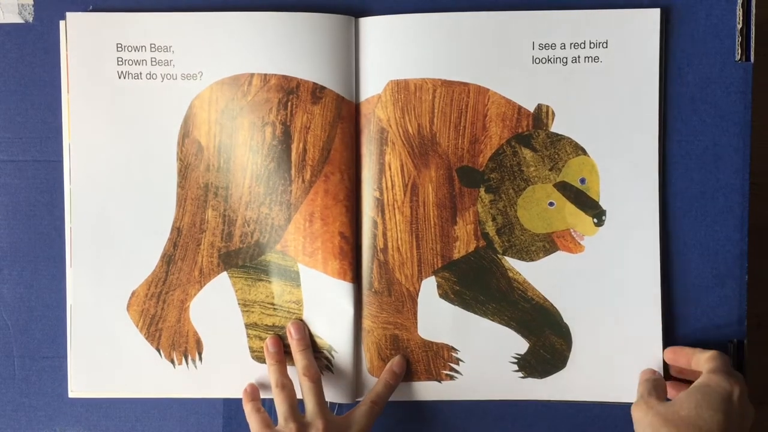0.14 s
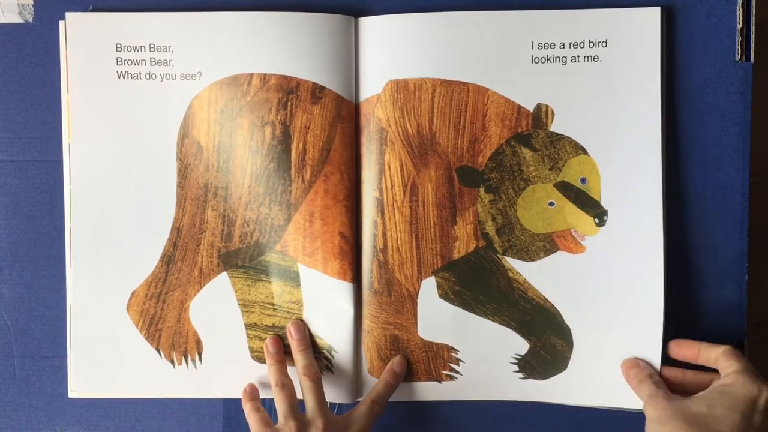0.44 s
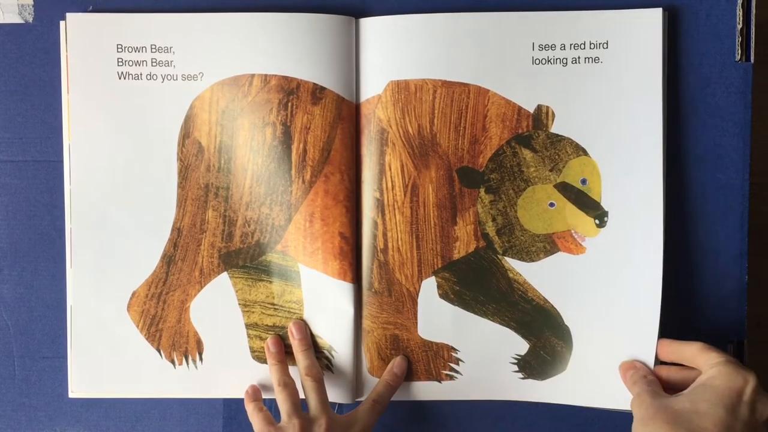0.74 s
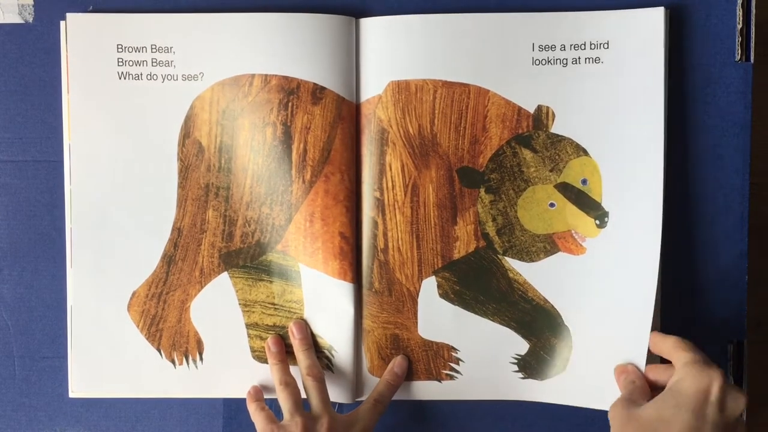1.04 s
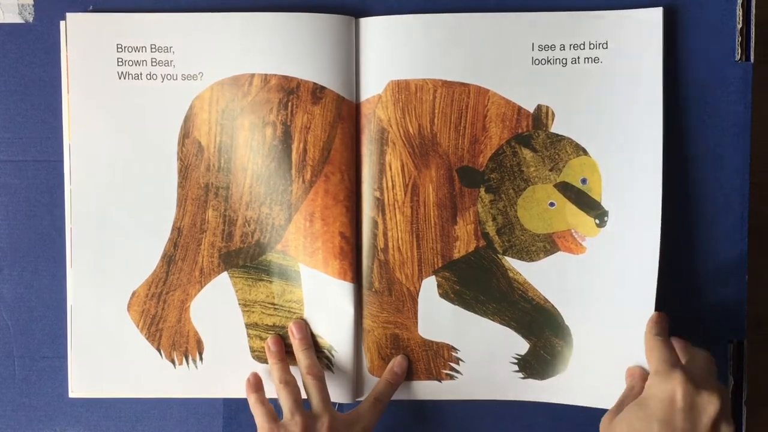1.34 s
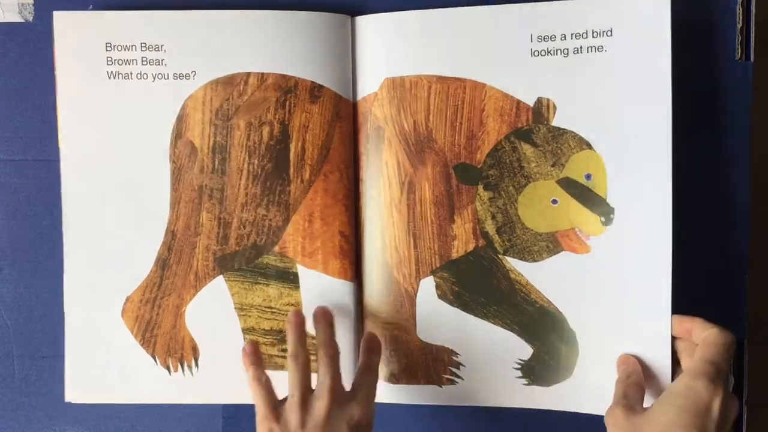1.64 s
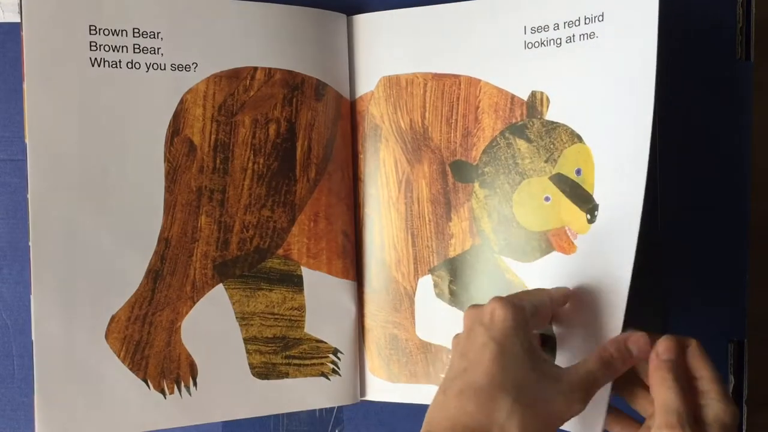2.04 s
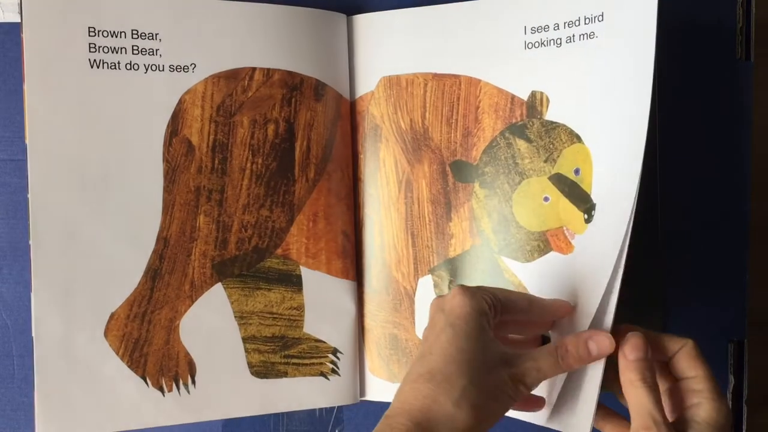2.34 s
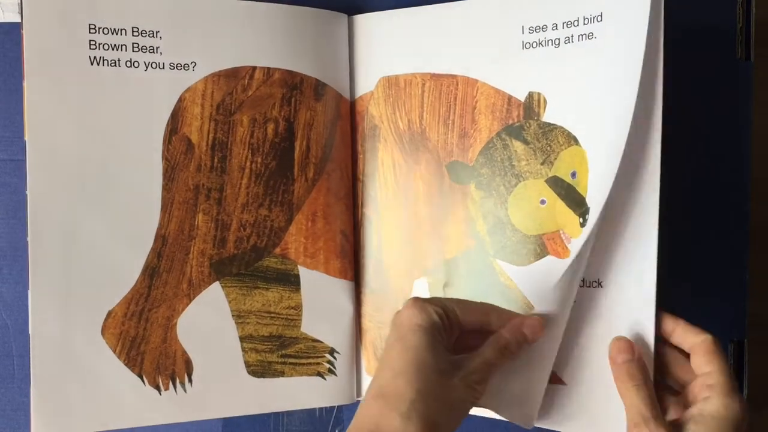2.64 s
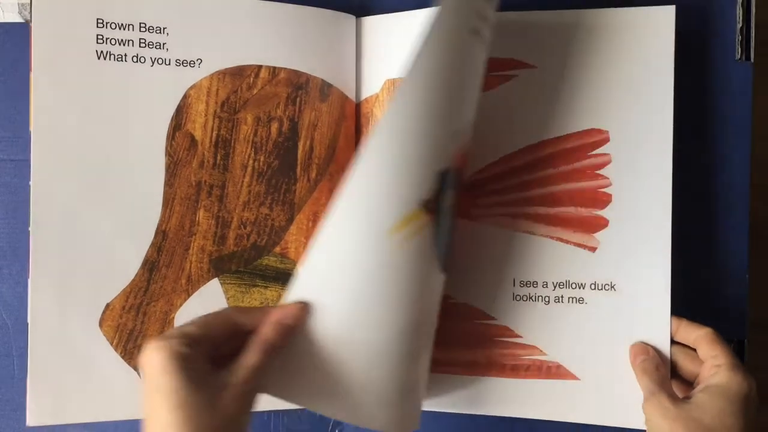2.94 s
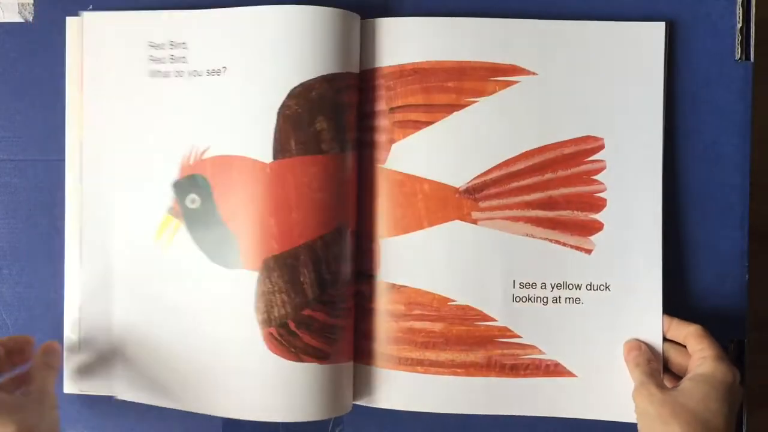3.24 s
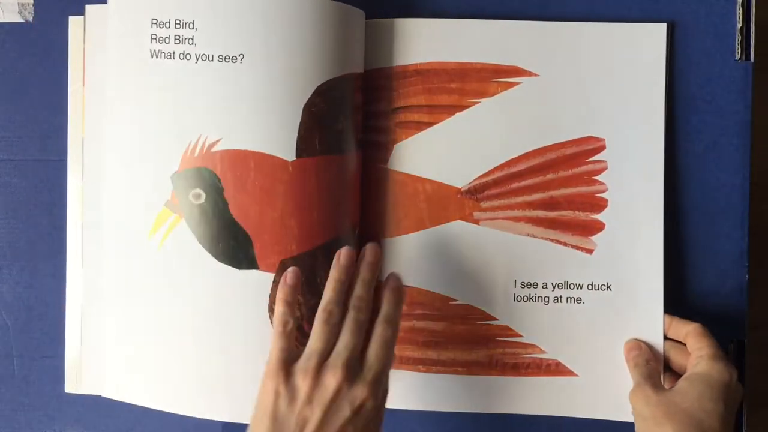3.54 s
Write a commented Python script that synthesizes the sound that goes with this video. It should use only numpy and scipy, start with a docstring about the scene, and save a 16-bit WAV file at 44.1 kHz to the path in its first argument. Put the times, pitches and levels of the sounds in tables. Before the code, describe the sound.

A large book page is fingered, lifted and flopped over with a loud papery crack

```python
"""In a quiet small room, a large picture book lies on a table, heard from close above.
Fingers rub along the page edge (grainy friction noise) and knock on the book (paper noise and decaying modes),
which settles on the table with deep thuds. The sheet slides off its neighbour (brighter friction noise) and
buckles with small snaps (filtered noise bursts), then flops down with pushes of air and a crack (a dispersed
burst), and the hand smooths it flat. Reflections and a faint, steady, mostly low noise surround it."""
import sys
import numpy as np
from scipy import signal
from scipy.fft import rfft, irfft
from scipy.io import wavfile
from scipy.ndimage import uniform_filter1d, map_coordinates

SR = 44100
rng = np.random.default_rng(int(sys.argv[2]) if len(sys.argv) > 2 else 0)


def unload_wav(signal):
    """Save mono or channel-first audio to the path in sys.argv[1] as 16-bit WAV at rate SR, clipped to [-1, 1]."""
    wavfile.write(
        sys.argv[1],
        SR,
        np.round(np.clip(np.atleast_2d(signal).T, -1, 1) * 32767).astype(np.int16),
    )


N = 163170

# Event levels are source levels, ahead of the room and the microphone.
# Steady noise over the whole scene. Each row: frequency in Hz, relative level in dB.
FLOOR_SPECTRUM = [(15, -31), (25, -6.5), (69, 5.5), (172, -10), (278, -3.5), (394, -13.5), (856, -12),
                  (1090, -12.5), (10300, -22.5), (15000, -21)]
FLOOR_DB = -61.5
# Later reverberation. Each row: frequency in Hz, level in dB relative to the direct sound.
ROOM_SPECTRUM = [(100, -13), (250, -12), (500, -13.5), (1000, -14), (3000, -15.5), (12000, -19)]
# First reflections. Each row: frequency in Hz, level in dB relative to the direct sound.
EARLY_SPECTRUM = [(250, -8), (700, -7), (3000, -10.5), (12000, -14)]
ROOM_T60_S, EARLY_T60_S, REFLECTION_DELAY_S = 0.52, 0.071, 0.004
# Microphone response. Each row: frequency in Hz, gain in dB.
MICROPHONE_RESPONSE = [(3000, -5.5), (7000, -6.5), (9600, -6), (10300, -12.5), (11300, -8), (16000, -14)]
LOW_CUT_HZ, CUTOFF_HZ = 38.4, 16200

# Paper slides on paper or under the palm.
# Each row: start in seconds, length in seconds, level in dB, centre in Hz, sharpness of the resonance.
SLIDES = [(0.343, 0.028, -54, 7100, 1.6), (0.531, 0.033, -54.5, 3400, 1.3),
          (1.127, 0.085, -61.5, 6000, 0.67), (1.343, 0.085, -49.5, 2950, 1.3),
          (1.582, 0.1, -59.5, 2500, 0.96), (1.867, 0.026, -55, 6950, 0.33), (2.018, 0.041, -54, 2340, 1.45),
          (2.188, 0.06, -60, 9000, 0.37), (2.3, 0.013, -48.5, 6200, 0.81), (2.344, 0.012, -48, 9300, 2.1),
          (2.496, 0.055, -52.5, 4530, 2.2), (2.61, 0.1, -47, 2100, 0.98), (2.706, 0.2, -60, 3000, 1),
          (2.833, 0.054, -44.5, 2740, 1), (2.954, 0.061, -51, 3570, 1.65), (3.189, 0.055, -55, 5440, 1),
          (3.239, 0.055, -43, 4500, 0.42), (3.338, 0.065, -45, 4800, 1.3), (3.485, 0.043, -40, 2970, 1.14)]
# Slide and crack spectrum. Each row: ratio to the centre, relative level in dB (for slides, times sharpness).
SLIDE_SHAPE = [(.05, -6), (.25, -5), (.55, -1.5), (1, 1), (1.6, -6.5), (2.6, -10.5), (6, -20)]
SLIDE_SWELL, SLIDE_FADE = 0.21, 0.42  # shares of the slide's length
# Fingertips rub the page. Each row: start in seconds, length in seconds, level in dB, mid-stroke resonance in Hz.
RUBS = [(0.0, 0.0061, -44.5, 553), (0.517, 0.065, -54, 1140), (0.575, 0.13, -53, 1460),
        (0.881, 0.17, -53.5, 1420), (1.161, 0.13, -62, 1480), (1.332, 0.067, -52.5, 1690),
        (1.586, 0.094, -56, 1020), (1.874, 0.039, -45, 770), (2.006, 0.061, -53, 806),
        (2.125, 0.15, -61, 1400), (2.201, 0.049, -54.5, 760), (2.803, 0.091, -50, 920),
        (2.99, 0.056, -49.5, 820), (3.185, 0.1, -46.5, 780), (3.36, 0.0973, -43, 880),
        (3.501, 0.062, -50.5, 820)]
# Rub and catch spectrum. Each row: ratio to the resonance, relative level in dB.
RUB_SHAPE = [(.15, -22.5), (.5, -17), (.8, 4), (1, 12), (1.4, -4), (3, -13.5), (10, -37)]
RUB_ATTACK_S, RUB_RELEASE_S = 0.0054, 0.018
RUB_GLIDE_PER_S = 0.495  # the resonance rises as the finger nears the edge
RUB_BOARD_DB, RUB_BOARD_HZ = 6.5, 273  # relative gain and centre of the book board stirred by a rub
CRINKLES_PER_S, CRINKLE_DB = 650, -6  # level relative to the slips
CRINKLE_SPREAD_DB, CRINKLE_T60_S = 2.5, 0.012
BEND_RIPPLE_DB, BEND_PEAKS_PER_OCTAVE = 2.5, 5.95  # standard deviation; density well above 1 kHz
# A rubbing fingertip catches and lets go. Each row: start in seconds, level in dB.
CATCHES = [(0.552, -52.5), (0.964, -53), (1.014, -58), (1.163, -40.5), (1.193, -42)]
CATCH_HZ, CATCH_T60_S = 1460, 0.059

# The book settles on the table. Each row: start in seconds, level in dB.
THUDS = [(0.741, -55.5), (1.066, -45.5), (1.514, -36.5)]
# Modes of the table. Each row: frequency in Hz, relative level in dB, share of the table's t60.
TABLE_MODES = [(69, 6, 1), (129, -15, 0.3)]
TABLE_T60_S = 0.13
# Fingers knock on the book. Each row: start in seconds, book board level in dB,
# board t60 under the finger in seconds, paper tap level in dB, top of the tap in Hz.
KNOCKS = [(0.026, -58, 0.034, -48.5, 2780), (0.366, -54, 0.13, -56, 6000), (0.685, -59, 0.062, -54.5, 7060),
          (0.72, -48.5, 0.12, -45, 3370), (1.037, -44, 0.055, -44, 3420), (1.163, -43, 0.084, -45, 4680),
          (1.191, -53, 0.053, -49, 3130), (1.396, -36.5, 0.045, -31.5, 3180),
          (1.411, -33.5, .09, -38.5, 1480), (1.471, -37, 0.028, -41.5, 750),
          (1.497, -35, 0.037, -40.5, 740), (1.64, -39.5, 0.11, -49, 890), (1.781, -25.5, 0.14, -32.5, 3500),
          (1.845, -39.5, 0.065, -41, 2650), (1.88, -50, 0.072, -42.5, 1350), (1.892, -37, 0.13, -49, 1320),
          (2.007, -49.5, 0.082, -55, 1810), (2.161, -66, .05, -49, 1800)]
# Modes of the book on the table. Each row: frequency in Hz, relative level in dB, share of the knock's t60.
BOARD_MODES = [(85, -17, 1), (160, -10, .5), (248, 0, 1), (330, -4, .3), (440, -5, .4), (560, -4, .35)]
BOARD_DETUNE = 0.018  # relative standard deviation: pitch differs with the place of the blow
# Paper tap before its low-pass. Each row: frequency in Hz, relative level in dB.
TAP_SPECTRUM = [(100, -16.5), (300, 7), (520, 2.5), (750, -1), (1000, 3), (1500, 1), (2500, -6),
                (5000, -5.5), (15000, 6.5)]
TAP_T60_S, TAP_CLICK, TAP_RISE_S = 0.042, 0.73, 0.00291  # click amplitude against a flutter of unit energy

# The paper snaps. Each row: start in seconds, level in dB, centre in Hz, sharpness of the resonance.
SNAPS = [(0.253, -53.5, 1260, 1.33), (1.574, -51, 4800, 0.98), (1.586, -44.5, 7900, 0.37),
         (1.7806, -38, 15200, 5.1), (2.16, -58.5, 14000, 0.74), (2.696, -31, 3900, 1.3),
         (2.835, -41.5, 1220, 2.6), (2.851, -34.5, 1200, 1.63), (2.881, -43, 1160, 4.1),
         (2.967, -34.5, 1060, 1.02), (2.989, -34.5, 1140, 1)]
# Snap spectrum. Each row: ratio to the centre, relative level in dB (times the sharpness).
SNAP_SHAPE = [(.06, -7.5), (.4, -7.5), (.75, -0.5), (1.1, -0.5), (1.6, -10.5), (3.5, -13), (11, -32)]
SNAP_T60_S, SNAP_CLICK, SNAP_RISE_S = 0.033, 0.55, 0.0014
# The whole sheet buckles and flops over.
# Each row: start in seconds, sheet level in dB, top of the sheet sound in Hz, push of air in dB.
FLOPS = [(3.068, -37, 1210, -46), (3.172, -35, 1190, -30), (3.177, -27, 1070, -32.5),
         (3.198, -32.5, 1020, -55), (3.302, -26.5, 1360, -52), (3.309, -13.5, 2720, -27),
         (3.317, -22, 1390, -28.5), (3.324, -21.5, 1400, -50), (3.336, -17, 2170, -47),
         (3.344, -16.5, 1410, -43), (3.351, -32.5, 4020, -45), (3.394, -30, 1800, -52),
         (3.419, -28, 1330, -47)]
# Large sheet before its low-pass. Each row: frequency in Hz, relative level in dB.
SHEET_SPECTRUM = [(80, -29), (170, -4), (240, 2.5), (370, -7), (480, -12), (660, -2), (790, -3), (920, 5),
                  (1060, 2), (1130, -7.5), (1400, -1.5), (2300, -12.5), (2850, -5.5), (3500, -21.5),
                  (15000, 3)]
# Pushed air. Each row: frequency in Hz, relative level in dB.
AIR_PUSH_SPECTRUM = [(30, -29.5), (58, 9), (85, 1), (125, -7), (170, -2), (240, 5.5), (330, 0.5),
                     (500, -33.5), (6000, -56.5)]
FLOP_T60_S, FLOP_CLICK, FLOP_RISE_S, PUSH_T60_S = 0.043, 0.37, 0.002, 0.28
CRACK_S, CRACK_DB, CRACK_CENTRE_HZ, CRACK_T60_S = 3.327, -20.5, 2060, 0.12
SPREAD_S = 0.0064  # travel time of a 1 kHz bending wave

LEVEL_WINDOW_S = 0.01  # a hit at 0 dB has the energy of rms 1 over this time
SIZE = 16384  # samples in one event or filter
T = np.arange(SIZE) / SR
HZ = np.maximum(np.arange(SIZE // 2 + 1) * SR / SIZE, 1)


def from_db(db):
    """Level law: twenty decibels are a factor of ten in amplitude."""
    return 10 ** (np.asarray(db) / 20)


def rms_one(x):
    """Normalisation by mean power: the result has rms 1."""
    return x / np.sqrt(np.mean(x ** 2) + 1e-20)


def unit_hit(x):
    """Normalisation by energy: a transient gets the energy of rms 1 over the level window."""
    return x * np.sqrt(LEVEL_WINDOW_S * SR / np.sum(x ** 2))


def add(out, start_s, x):
    """Superposition: pressures add from the given moment on."""
    i = max(int(start_s * SR), 0)
    out[i:i + len(x)] += x[:max(N - i, 0)]


def gains(points, centre_hz=1):
    """Frequency response: levels run in straight lines over logarithmic frequency."""
    ratio, db = np.transpose(points)
    return from_db(np.interp(np.log(HZ / centre_hz), np.log(ratio), db))


def below(top_hz, steepness):
    """Low-pass: the gain falls by steepness times 6 dB per octave well above the top."""
    return 1 / np.sqrt(1 + (HZ / top_hz) ** (2 * steepness))


def colour(x, gain):
    """Minimum-phase filtering: folding the cepstrum makes the response causal."""
    cepstrum = irfft(np.log(gain + 1e-6))
    cepstrum[1:SIZE // 2] *= 2
    cepstrum[SIZE // 2 + 1:] = 0
    response = irfft(np.exp(rfft(cepstrum)))
    return signal.fftconvolve(x, response)[:len(x)]


def dying(t60):
    """Exponential damping: the level falls by 60 dB in t60."""
    return np.exp(-np.log(1000) * T / t60)


def flutter(t60, rise=1e-5):
    """Damped random vibration: noise of even spectrum and near unit energy, cut off after 0.19 s."""
    noise = rng.standard_normal(SIZE) * dying(t60) * np.minimum(T / rise, 1)
    spectrum = rfft(noise)
    power = uniform_filter1d(np.abs(spectrum) ** 2, size=48)
    return irfft(spectrum / np.sqrt(power)) * (T < T[-1] / 2)


def hit(gain, t60, click=0, rise=1e-5):
    """Impulsive excitation: a flutter with a click halfway up its rise, filtered by the body."""
    x = flutter(t60, rise)
    x[int(rise * SR / 2)] += click
    return unit_hit(colour(x, gain))


def ring(modes, t60):
    """Modal superposition: damped sines with a soft onset, varied a little at every blow."""
    x = np.zeros(SIZE)
    for hz, db, share in modes:
        gain = from_db(db + rng.normal(0, 1))
        pitch = hz * rng.normal(1, BOARD_DETUNE)
        x += gain * np.sin(2 * np.pi * pitch * T) * dying(t60 * share)
    return unit_hit(x * np.minimum(T / TAP_RISE_S, 1))


def bend():
    """Plate resonance: each bend of the sheet has chance peaks and dips of its own."""
    place = BEND_PEAKS_PER_OCTAVE * np.log2(1 + HZ / 1000)
    return from_db(BEND_RIPPLE_DB * np.interp(place, np.arange(SIZE), rng.standard_normal(SIZE)))


def crinkles(count=256):
    """Random impulses: tiny kinks at chance moments each ring briefly at a pitch of their own."""
    out, t = np.zeros(N), T[:count]
    decay = from_db(-60 * t / CRINKLE_T60_S)
    for moment, size, pitch in rng.random((count, 3)) * [count / CRINKLES_PER_S, 1, CUTOFF_HZ]:
        strength = from_db(CRINKLE_SPREAD_DB * np.minimum(-np.log(size), np.pi))
        add(out, moment, strength * np.sin(2 * np.pi * pitch * t) * decay)
    return rms_one(out[:SIZE])


def friction(length, attack, release, gain, grain_db, grains_per_s):
    """Sliding friction: uneven tiny slips and crinkles excite the sheet under a swell and fade."""
    grain = np.interp(T * grains_per_s, np.arange(SIZE), rng.standard_normal(SIZE))
    slips = rms_one(rng.standard_normal(SIZE) * from_db(grain_db * grain))
    force = slips + from_db(CRINKLE_DB) * crinkles()
    swell = 1 - np.exp(-(T / attack) ** 2)
    fade = np.exp(-(np.maximum(T - length + release / 2, 0) / release) ** 2)
    return swell * fade * rms_one(colour(force, gain * bend()))


def background_noise():
    """Stationary noise: its spectrum and level stay the same throughout."""
    noise = rng.standard_normal(N + SIZE)
    settled = colour(noise, gains(FLOOR_SPECTRUM))[SIZE:]  # drop the filter's start
    return from_db(FLOOR_DB) * rms_one(settled)


def room(x):
    """Reverberation: quick reflections from the table and near walls, then a short tail."""
    early = colour(flutter(EARLY_T60_S), gains(EARLY_SPECTRUM))
    tail = colour(flutter(ROOM_T60_S), gains(ROOM_SPECTRUM))
    out = x.copy()
    add(out, REFLECTION_DELAY_S, signal.fftconvolve(x, early + tail)[:N])
    return out


def thuds():
    """Structural excitation: the weight of the book drops onto the table and rings its low modes."""
    out = np.zeros(N)
    for start, db in THUDS:
        add(out, start, from_db(db) * ring(TABLE_MODES, TABLE_T60_S))
    return out


def knocks():
    """Contact damping: a knock taps the paper and rings the book, more briefly if the finger stays down."""
    out = np.zeros(N)
    for start, board_db, t60, tap_db, top_hz in KNOCKS:
        tap_gain = gains(TAP_SPECTRUM) * below(top_hz, steepness=2.98) * bend()
        tap = hit(tap_gain, TAP_T60_S, TAP_CLICK, TAP_RISE_S)
        add(out, start, from_db(board_db) * ring(BOARD_MODES, t60) + from_db(tap_db) * tap)
    return out


def catches():
    """Stick and slip: skin slips free of the page with a hollow tick."""
    out = np.zeros(N)
    for start, db in CATCHES:
        add(out, start, from_db(db) * hit(gains(RUB_SHAPE, CATCH_HZ), CATCH_T60_S, SNAP_CLICK))
    return out


def rubs():
    """Resonant friction: hollow, grainy finger strokes also stir the board and rise in pitch."""
    out = np.zeros(N)
    board = from_db(RUB_BOARD_DB) / (1 + (10 * np.log(HZ / RUB_BOARD_HZ)) ** 2)
    for start, length, db, hz in RUBS:
        gain = gains(RUB_SHAPE, hz) + board
        rub = friction(length, RUB_ATTACK_S, RUB_RELEASE_S, gain, grain_db=3.5, grains_per_s=520)
        # reading ever faster raises the pitch; the speed is 1 at mid-stroke
        read_at = SR * T * (1 + RUB_GLIDE_PER_S * (T - length) / 2)
        add(out, start, from_db(db) * map_coordinates(rub, [read_at]))
    return out


def slides():
    """Broadband friction: paper sliding on paper or under the palm sounds brighter than a rub."""
    out = np.zeros(N)
    for start, length, db, hz, sharpness in SLIDES:
        gain = gains(SLIDE_SHAPE, hz) ** sharpness
        attack, release = SLIDE_SWELL * length, SLIDE_FADE * length
        slide = friction(length, attack, release, gain, grain_db=2.5, grains_per_s=380)
        add(out, start, from_db(db) * slide)
    return out


def snaps():
    """Snap-through buckling: small kinks in the paper jump through and ring it."""
    out = np.zeros(N)
    for start, db, centre_hz, sharpness in SNAPS:
        gain = gains(SNAP_SHAPE, centre_hz) ** sharpness * bend()
        add(out, start, from_db(db) * hit(gain, SNAP_T60_S, SNAP_CLICK, SNAP_RISE_S))
    return out


def flops():
    """Large-scale buckling: large bends jump through, ringing the sheet and pushing air."""
    out = np.zeros(N)
    for start, db, top_hz, push_db in FLOPS:
        sheet_gain = gains(SHEET_SPECTRUM) * below(top_hz, steepness=2.77)
        sheet = hit(sheet_gain, FLOP_T60_S, FLOP_CLICK, FLOP_RISE_S)
        push = hit(gains(AIR_PUSH_SPECTRUM), PUSH_T60_S)
        add(out, start, from_db(db) * sheet + from_db(push_db) * push)
    return out


def crack():
    """Dispersion: as the edge whips down, high bending waves run faster, so the crack chirps downward."""
    out = np.zeros(N)
    whip = hit(gains(SLIDE_SHAPE, CRACK_CENTRE_HZ), CRACK_T60_S, click=0.55)
    # this phase delays each frequency by SPREAD_S * sqrt(1000 / HZ)
    dispersion = np.exp(-4j * np.pi * SPREAD_S * np.sqrt(1000 * HZ))
    add(out, CRACK_S, from_db(CRACK_DB) * irfft(rfft(whip) * dispersion))
    return out


def scene():
    """Superposition: the book and hand sound in the room, over the steady noise."""
    book = thuds() + knocks()
    hand = catches() + rubs() + slides()
    sheet = snaps() + flops() + crack()
    return (background_noise() + room(book + hand + sheet))[None]


def record(dry):
    """Transducer response: the microphone loses deep bass and dips in the high treble; the top is cut."""
    low_cut = 1 / np.sqrt(1 + (LOW_CUT_HZ / HZ) ** 8)
    x = colour(dry[0], gains(MICROPHONE_RESPONSE) * low_cut)
    top_cut = signal.ellip(10, 0.1, 70, CUTOFF_HZ, fs=SR, output="sos")
    return signal.sosfilt(top_cut, x)[None]


dry = scene()
out = record(dry)
unload_wav(out)
```